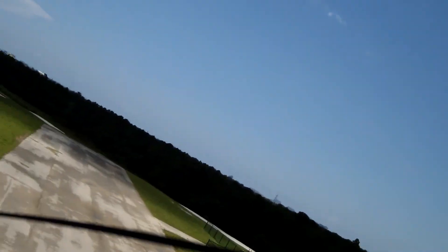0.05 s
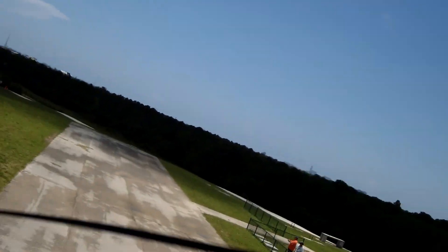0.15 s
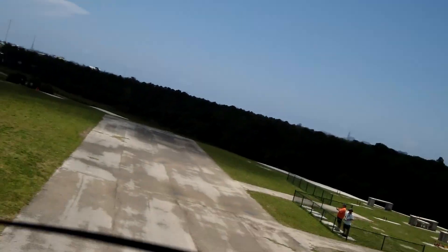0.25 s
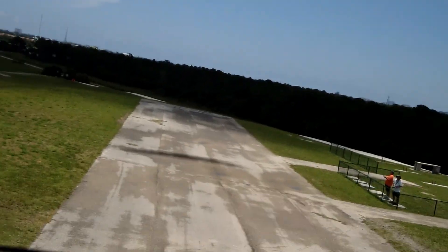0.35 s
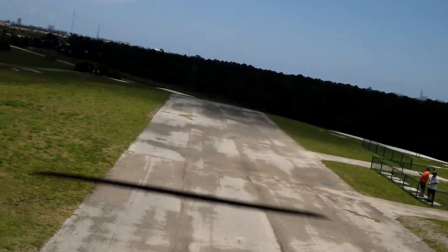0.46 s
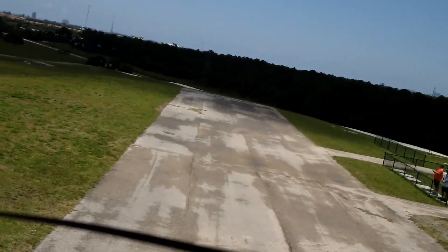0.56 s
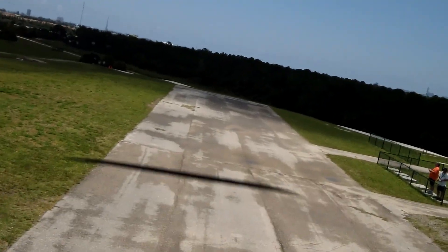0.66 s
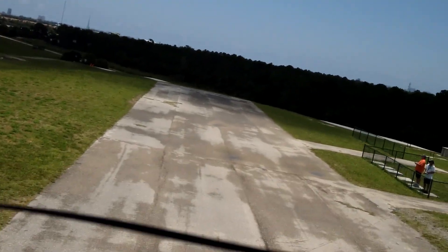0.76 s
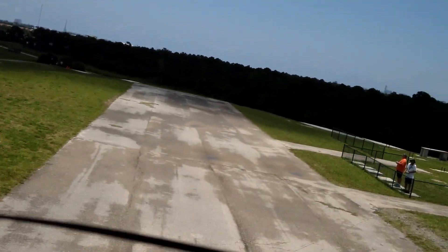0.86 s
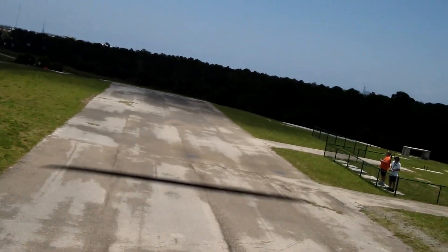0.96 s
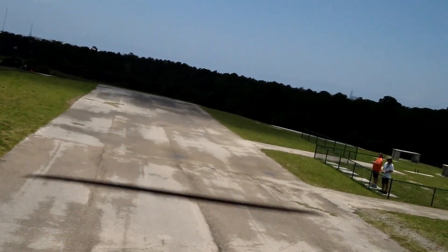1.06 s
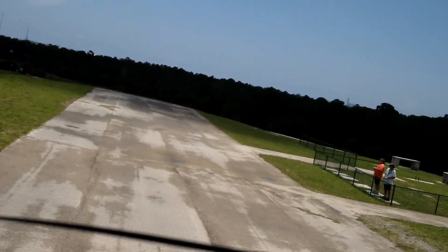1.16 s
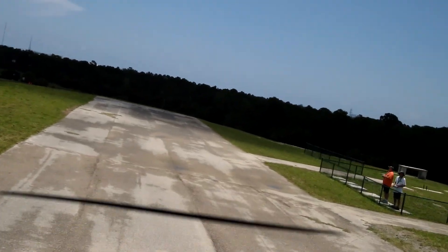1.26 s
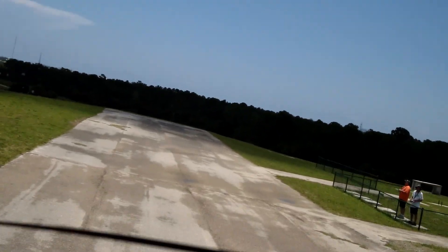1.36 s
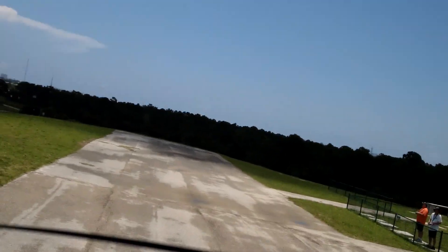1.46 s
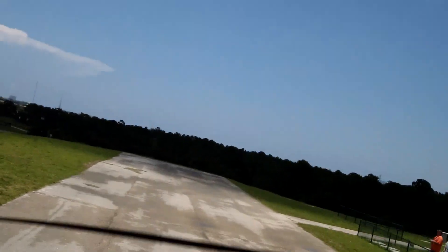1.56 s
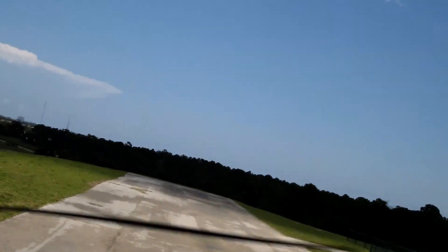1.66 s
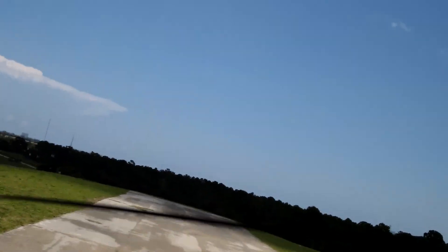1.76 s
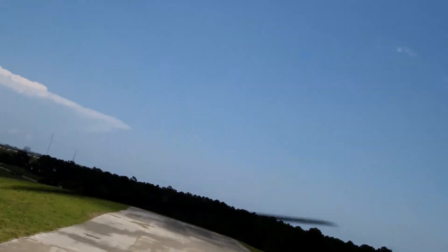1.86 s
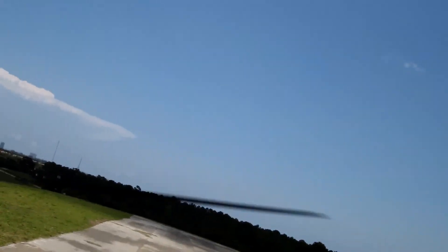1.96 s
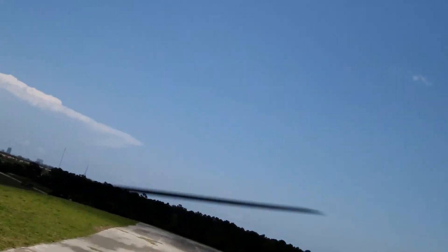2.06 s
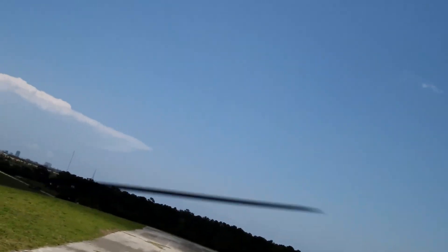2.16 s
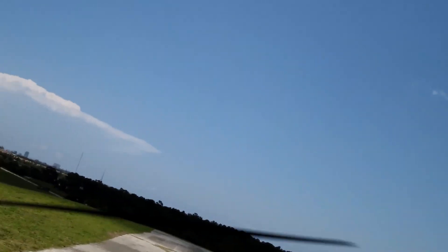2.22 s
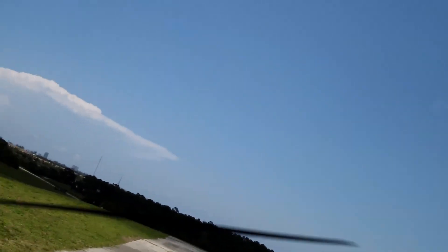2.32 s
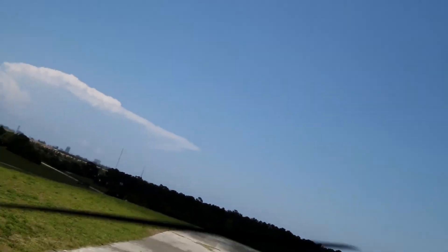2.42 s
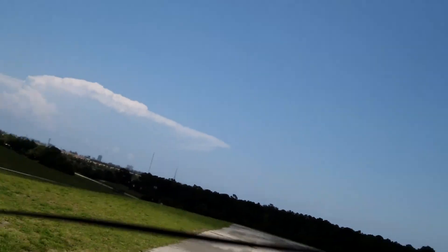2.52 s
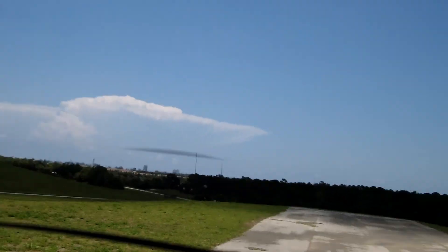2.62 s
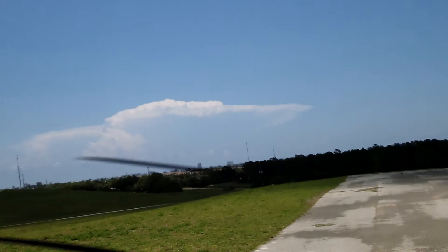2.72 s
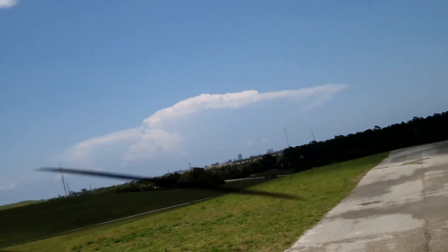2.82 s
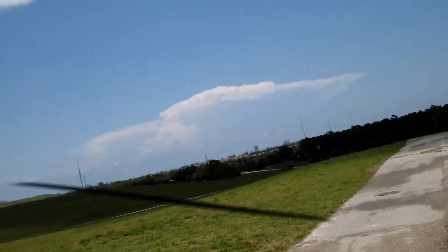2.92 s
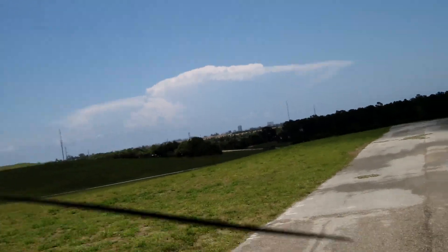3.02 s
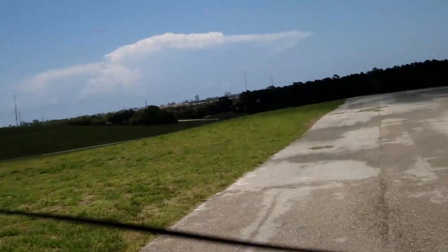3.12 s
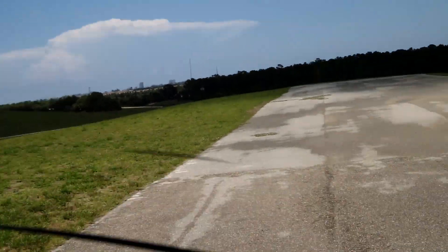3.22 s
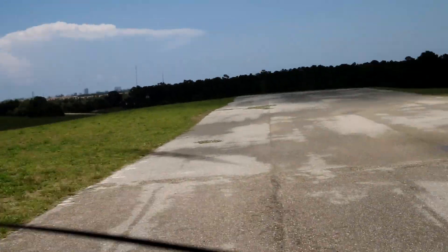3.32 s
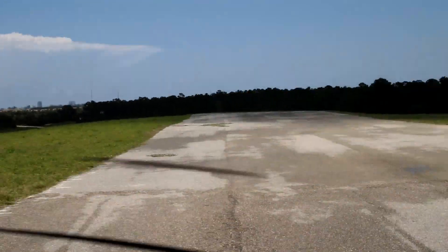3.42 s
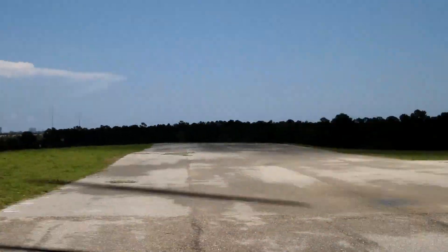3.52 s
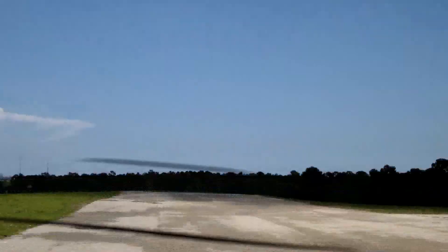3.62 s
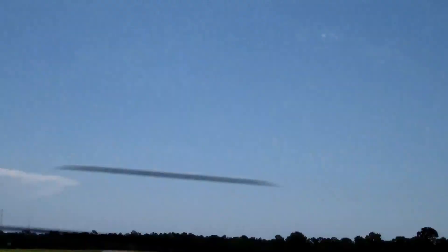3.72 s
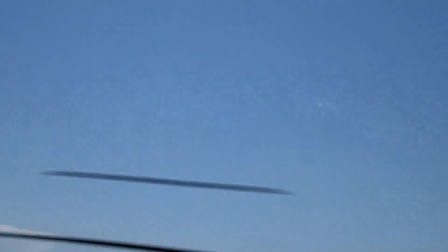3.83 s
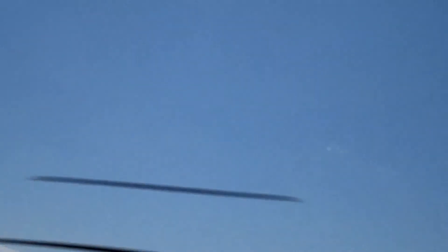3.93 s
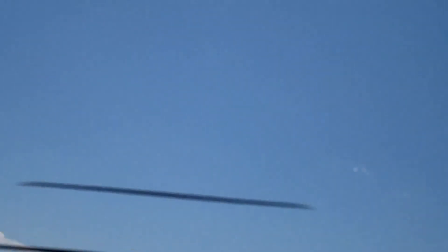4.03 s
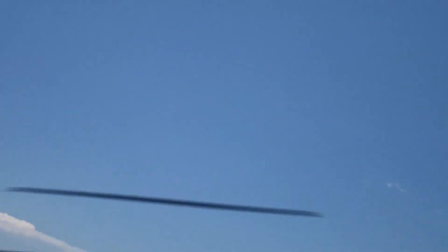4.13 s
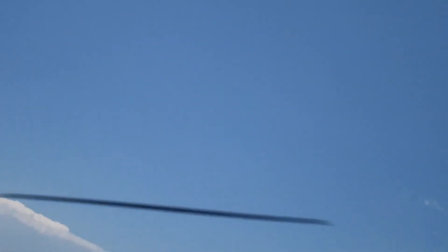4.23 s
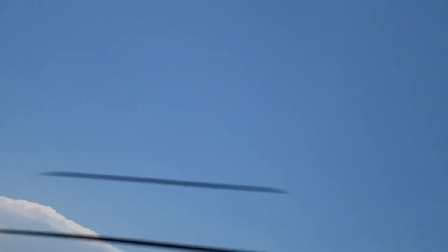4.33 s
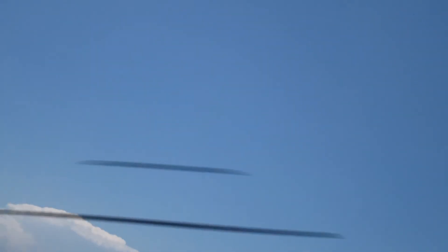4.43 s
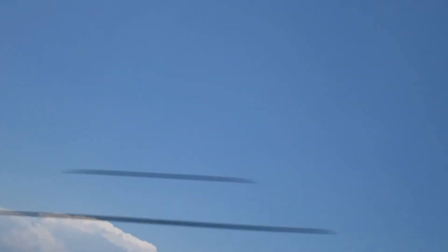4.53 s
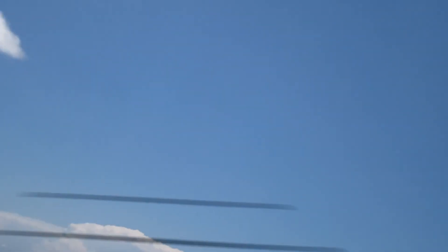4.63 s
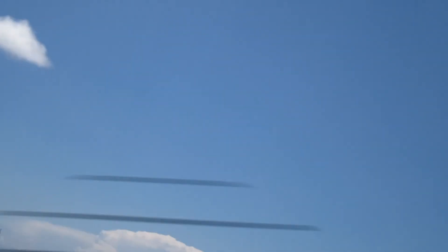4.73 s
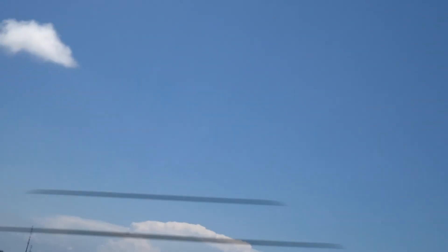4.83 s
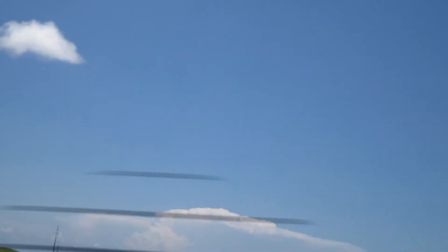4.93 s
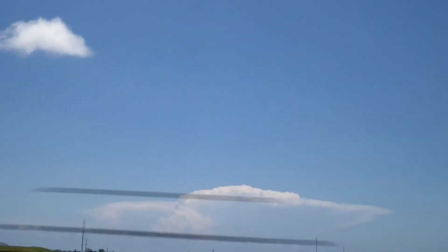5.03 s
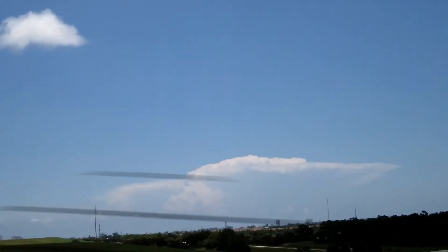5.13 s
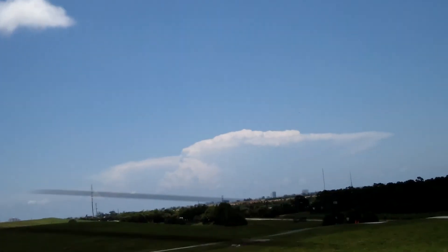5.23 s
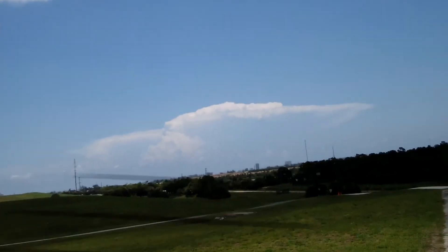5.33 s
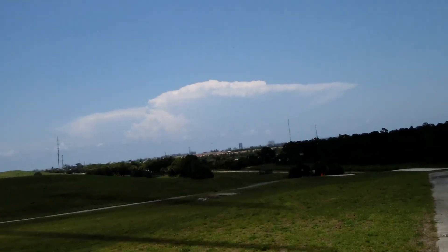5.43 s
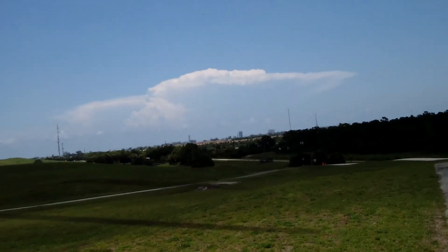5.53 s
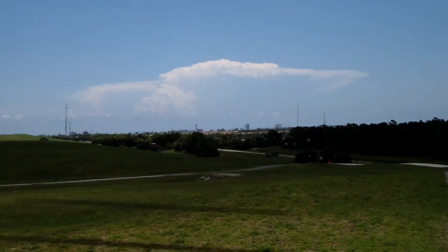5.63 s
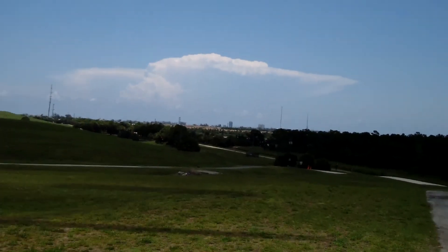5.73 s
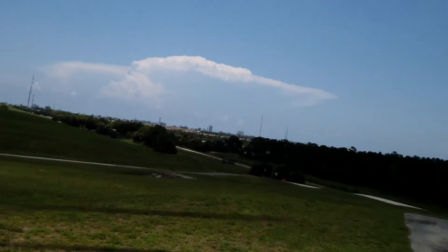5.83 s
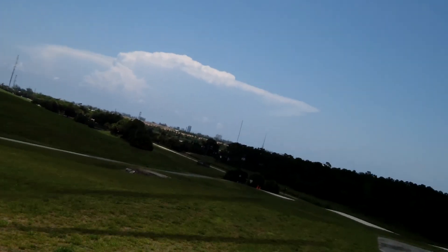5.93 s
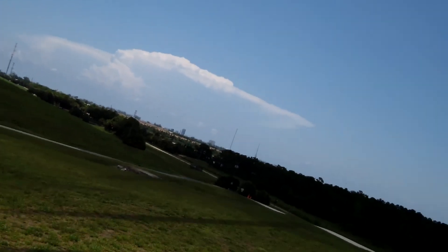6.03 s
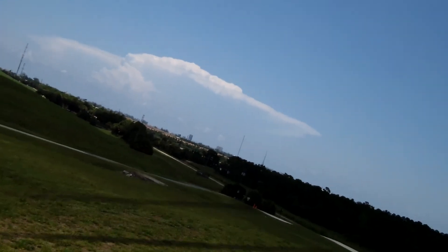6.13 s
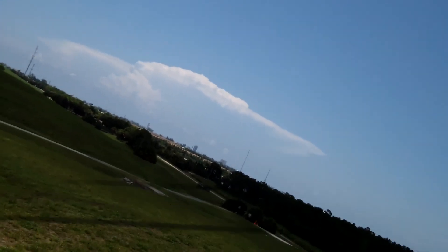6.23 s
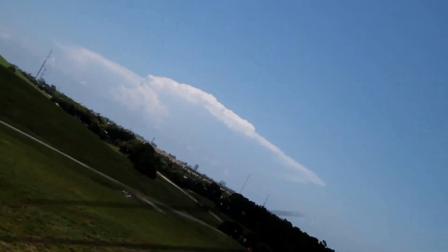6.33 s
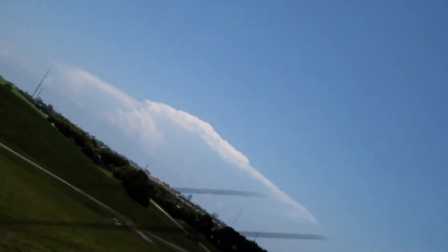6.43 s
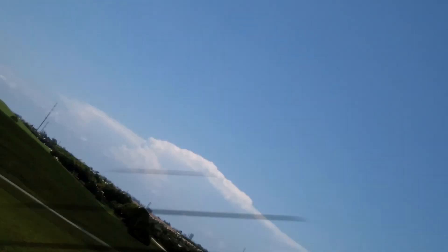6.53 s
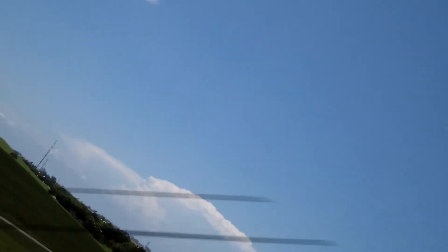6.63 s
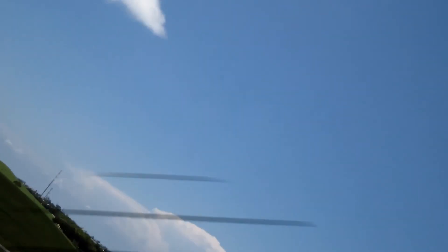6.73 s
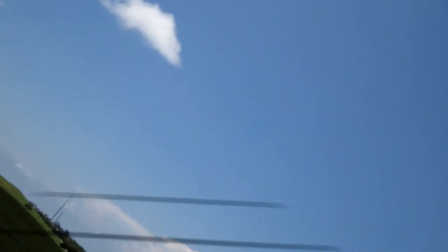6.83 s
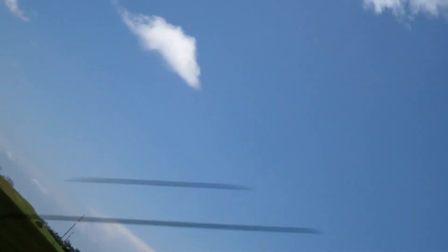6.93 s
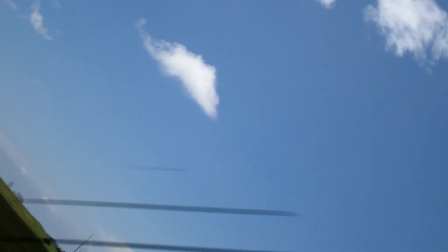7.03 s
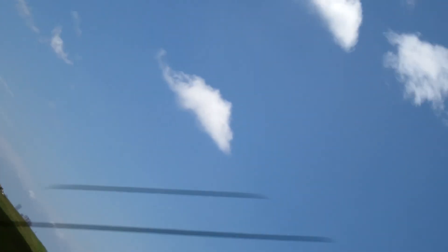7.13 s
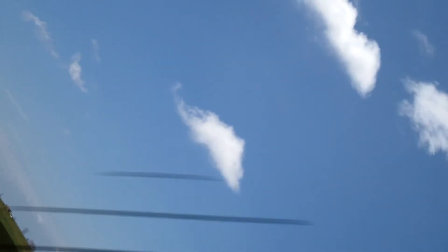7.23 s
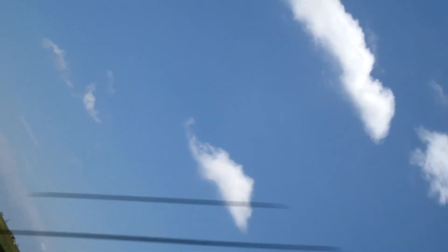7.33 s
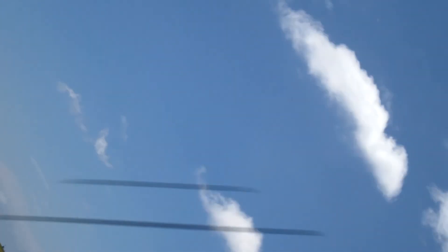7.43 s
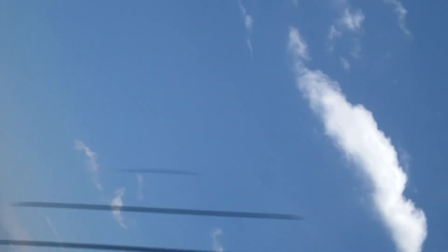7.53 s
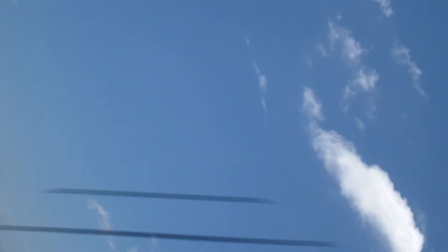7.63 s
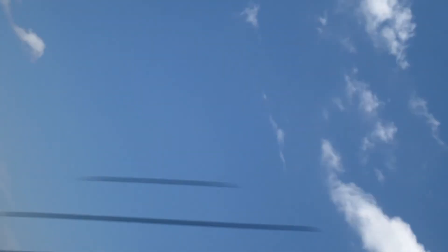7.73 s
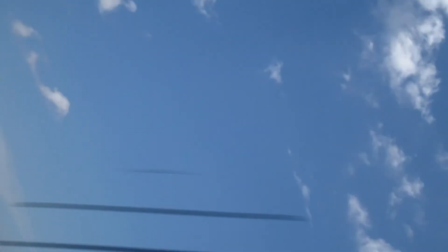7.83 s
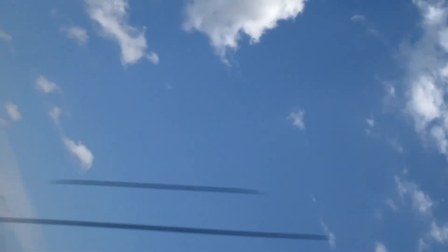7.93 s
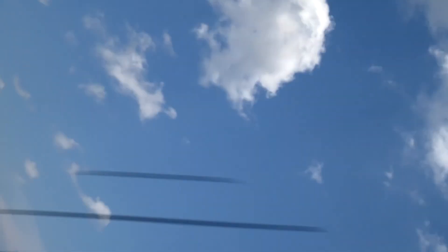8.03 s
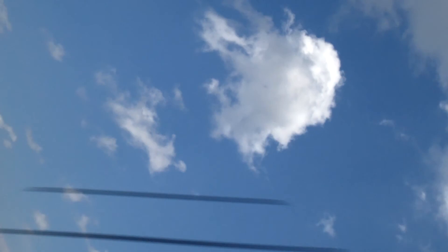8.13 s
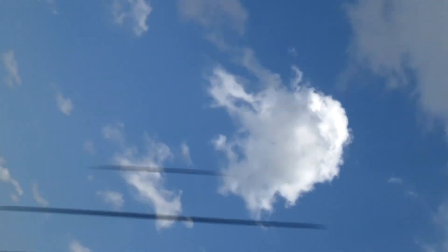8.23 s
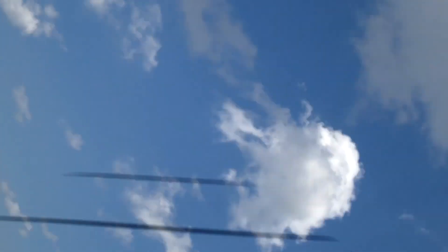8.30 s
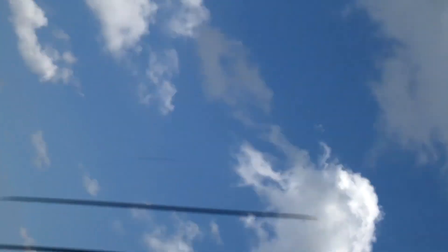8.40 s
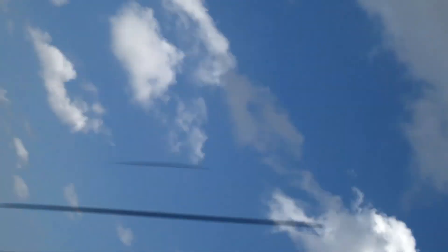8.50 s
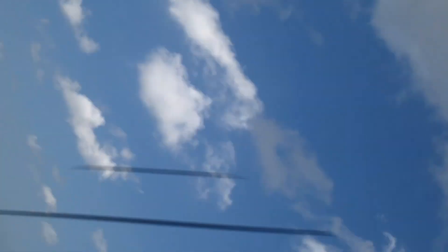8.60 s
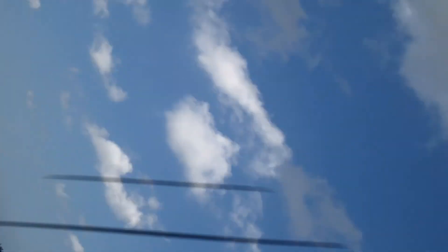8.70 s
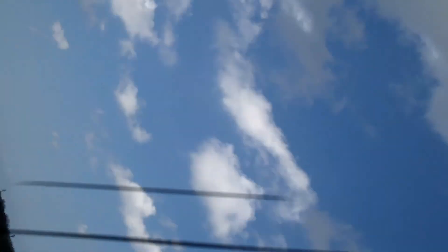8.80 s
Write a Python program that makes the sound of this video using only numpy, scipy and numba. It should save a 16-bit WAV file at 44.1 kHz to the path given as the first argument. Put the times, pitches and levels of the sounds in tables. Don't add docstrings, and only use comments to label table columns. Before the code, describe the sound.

A small camera strapped behind the two-blade propeller of an electric model plane over a grassy field. A low throbbing hum with thin motor whine rises in small steps, sags slightly, then gusts thump the microphone. The throttle opens in stages to a loud, distorted buzzing roar that holds for several seconds before dropping in pitch near the end.

```python
import sys
import numpy as np
from scipy import signal
from scipy.fft import rfft, irfft
from scipy.io import wavfile
from scipy.ndimage import uniform_filter1d
from numba import njit

SR = 44100
rng = np.random.default_rng(int(sys.argv[2]) if len(sys.argv) > 2 else 0)


def gain_from_decibels(decibels):
    exponent = np.asarray(decibels, float) / 20
    return 10 ** exponent


def dump(signal):
    limited = np.clip(np.atleast_2d(signal).T, -1, 1)
    pcm = np.round(limited * 32767).astype(np.int16)
    wavfile.write(sys.argv[1], SR, pcm)


N = 390726

# start_s, travel_s, blade_rate_change_hz
THROTTLE = [
    (.902, .042, 24.6),
    (1.219, .021, 13.9),
    (1.555, 1.137, -4.67),
    (3.382, .151, 18.45),
    (3.526, .129, 32.2),
    (4.404, .097, 23.73),
    (4.546, .249, 103.96),
    (5.021, .629, -2.1),
    (7.966, .233, -28.56),
    (8.272, .265, -38),
]
# time_s, tone_db, air_db
BLADE_LOAD = [(.1, -17, 2), (.85, -16.5, -1), (1.22, -22.5, 2), (1.55, -16.5, 1), (2.24, -16.5, 0),
              (2.4, -20, 1), (2.58, -15.5, 0), (3.3, -13.5, -5), (3.7, -17.5, -3), (3.745, -17.5, 5),
              (3.93, -24.5, 5), (4.05, -21, 9), (4.22, -21, 4), (4.33, -14, 1), (4.5, -14, -3),
              (4.78, -8.3, -2), (5.7, -4.3, 1), (8.86, -7.3, 1)]
# time_s, octave_lag_turns
INFLOW_LEAN = [(0, -.3), (1.1, -.35), (1.45, .07), (2.35, .02), (2.55, .15), (2.8, .16), (2.97, .32),
               (3.4, .24), (3.7, .06), (4.45, .08), (5.1, 0), (5.8, .04), (8, .05), (8.45, .19),
               (8.86, .19)]
# times_per_turn, under_blade_tone_db, lag_turns
TIP_BUZZ = [(1, -21, .15), (3, -14, 0.11), (6, -24.5, .22), (8, -23, 0.34), (10, -26, .4)]
# times_per_turn, on_shake_db, on_octave_db
SHAFT_ORDERS = [(1, 5.5, -30.5), (3, -10.5, -9.5), (5, -12.5, -10), (6, -37.5, -7), (7, -23.5, -12.5),
                (8, -26.5, -18), (9, -17, -24), (10, -23.5, -25.5)]
# times_per_turn, level_db, phase_wander_rad
MOTOR_LINES = [(12, -43, .2), (14, -40, .2), (18, -50, .15), (24, -50, .15), (28, -53, .15), (29, -54, .15),
               (36, -49.5, .15), (42, -44, .2), (56, -61, .2), (92, -48, 14)]
# freq_hz, gain_db
SHELL_GAIN = [(580, -4), (680, 5.5), (780, 0), (910, -3), (1160, -13), (1260, -2), (1560, -1), (1730, 9),
              (2050, -8), (2400, -7), (2750, 0), (2940, 7), (3080, -5), (3250, -35), (5880, -40),
              (6040, -22), (6250, -40)]
# freq_hz, density_db_per_hz
BUFFET_COLOUR = [(12, -43.5), (25, -2.5), (60, 0), (110, -0.5), (200, -8), (350, -9.5), (520, -22.5),
                 (800, -42.5), (1500, -46), (3000, -77)]
# freq_hz, density_db_per_hz
WAKE_COLOUR = [(30, -23.5), (70, -1.5), (150, 2), (300, -1.5), (600, -10), (1500, -27), (5000, -40.5),
               (16000, -71)]
# freq_hz, density_db_per_hz
RUSH_COLOUR = [(250, -18), (500, 0), (900, -4.5), (1300, -10.5), (2000, -15.5), (3000, -24.5),
               (4500, -32.5), (5300, -44), (7000, -54), (16000, -79.5)]
# freq_hz, density_db_per_hz
RATTLE_COLOUR = [(1000, -30.5), (1400, -8), (1750, 3.5), (2050, -6), (2250, -17.5), (2600, -16.5),
                 (2900, -11.5), (3150, -17), (3300, -26.5), (4600, -27.5), (5500, -46)]
# freq_hz, density_db_per_hz
HISS_COLOUR = [(1000, -9), (4000, 3), (8000, 0.5), (12000, -2.5), (16000, -2)]
# freq_hz, level_db
WHISTLE_LINES = [(11515, -89)]
# time_s, peak_db
LEVEL_TICKS = [(0.0298, -47), (0.5003, -49), (0.5447, -49), (0.8674, -49), (0.8914, -42), (1.0296, -45),
               (1.1069, -54), (1.2685, -48), (1.3039, -44), (1.4571, -44), (1.4825, -52), (2.3027, -48),
               (2.5182, -44), (2.9223, -53), (3.0096, -51), (3.033, -54), (4.1011, -57)]
# time_s, peak_db
GUST_SLAPS = [(0.459, -27), (2.532, -18.5), (3.011, -17.5), (3.035, -22), (3.15, -24), (3.746, -15),
              (3.809, -29), (3.934, -20), (4.066, -13), (4.242, -14.5), (4.304, -22.5), (4.481, -18),
              (4.611, -15.5)]

IDLE_HZ, START_HZ, CRUISE_HZ, FULL_HZ = 94.33, 109.6, 128., 305.
FOAM_HZ = 440


def walk(rate_hz):
    hold = int(SR / rate_hz)
    steps = np.repeat(rng.standard_normal(N // hold + 1), hold)
    return 1.3 * uniform_filter1d(uniform_filter1d(steps, hold), hold)[:N]


def curves(table):
    time_s, *columns = np.transpose(table)
    return [np.interp(np.arange(N) / SR, time_s, column) for column in columns]


def noise(colour):
    hz, db = np.transpose(colour)
    bins_hz = np.arange(N // 2 + 1) * SR / N + 1
    gain = gain_from_decibels(np.interp(np.log(bins_hz), np.log(hz), db))
    x = irfft(rfft(rng.standard_normal(N)) * gain, N)
    return x / np.std(x)


def struck(events, shape):
    hits = np.zeros(N)
    for time_s, db in events:
        hits[int(time_s * SR)] = gain_from_decibels(db)
    return signal.fftconvolve(hits, shape)[:N]


@njit
def spin(wanted_hz, hz, lag_s):
    out = np.empty(len(wanted_hz))
    for i in range(len(out)):
        out[i] = hz
        hz += (wanted_hz[i] - hz) / (SR * lag_s[int(hz)])
    return out


def speed():
    t = np.arange(N) / SR
    wanted_hz = IDLE_HZ + sum(hz * np.clip((t - start_s) / travel_s, 0, 1)
                              for start_s, travel_s, hz in THROTTLE)
    cruise_lag_s, lag_power = .166, 2.72
    return spin(wanted_hz, START_HZ, cruise_lag_s * (CRUISE_HZ / np.arange(1, 400)) ** lag_power)


def surge(blade_hz):
    growth_per_s = np.gradient(np.log(blade_hz)) * SR
    return np.clip(uniform_filter1d(growth_per_s, size=3000), 0, 1)


def order(turn, k, size, lag_rad, rough):
    level = np.sqrt(2) * size * gain_from_decibels(1.77 * rough * walk(35))
    return level * np.cos(k * turn - lag_rad + .12 * rough * walk(30))


def blade_thump(turn, tone_db, octave_db, lean):
    tone = order(turn, 2, gain_from_decibels(tone_db + 2.5), 0, .47)
    return tone + order(turn, 4, gain_from_decibels(octave_db), 2 * np.pi * lean, .82)


def tip_buzz(turn, blade_hz, tone_db):
    tips = gain_from_decibels(tone_db + 55 * np.log10(blade_hz / 305))
    return sum(order(turn, k, tips * gain_from_decibels(db), 2 * np.pi * lag_turns, .4) for k, db, lag_turns in TIP_BUZZ)


def shaft_shake(turn, blade_hz, shake_db, octave_db, lean):
    shake = 0
    for k, on_shake_db, on_octave_db in SHAFT_ORDERS:
        passed = np.minimum((2 * FOAM_HZ / k / blade_hz) ** 3 + (blade_hz / FULL_HZ) ** 3, 1)
        size = passed * (gain_from_decibels(shake_db + on_shake_db) + gain_from_decibels(octave_db + on_octave_db))
        shake = shake + order(turn, k, size, np.pi * (k - 2) * lean, 1.154)
    return shake


def propeller(turn, blade_hz, tone_db, octave_db, shake_db, lean):
    turn = turn + .1 * (128 / blade_hz) ** .3 * walk(45)
    thump = blade_thump(turn, tone_db, octave_db, lean)
    buzz = tip_buzz(turn, blade_hz, tone_db)
    return thump + buzz + shaft_shake(turn, blade_hz, shake_db, octave_db, lean)


def motor(turn, blade_hz):
    hz, shell_db = np.transpose(SHELL_GAIN)
    whine = 0
    for k, db, wander_rad in MOTOR_LINES:
        gain_db = np.interp(np.log(k * blade_hz / 2), np.log(hz), shell_db)
        level = gain_from_decibels(db + gain_db + 1.5 * walk(12))
        whine = whine + level * np.sin(k * turn + wander_rad * walk(90))
    surge_db, fade_db, fade_hz, fade_span_hz = 2.5, -13, 135, 170
    fade = np.clip((blade_hz - fade_hz) / fade_span_hz, 0, 1)
    return gain_from_decibels(surge_db * surge(blade_hz) + fade_db * fade) * whine


def wash(turn, blade_hz, tone_db, buffet_db, rush_db):
    pump = 1 + .3 * np.cos(2 * turn - 1.1)
    buffet = gain_from_decibels(buffet_db + 16.5 + 1.1 * walk(16)) * noise(BUFFET_COLOUR) * pump
    wake = gain_from_decibels(tone_db - 8 + 28 * np.log10(blade_hz / 305)) * noise(WAKE_COLOUR)
    rush = gain_from_decibels(rush_db + 8 + 1.7 * walk(60) + .4 * walk(12)) * noise(RUSH_COLOUR) * pump
    rattle = gain_from_decibels(-45.5 + 1.1 * walk(20)) * noise(RATTLE_COLOUR) * pump
    return buffet + wake + rush + rattle


def electronics():
    t = np.arange(N) / SR
    whistle = sum(np.sqrt(2) * gain_from_decibels(db) * np.sin(2 * np.pi * hz * t) for hz, db in WHISTLE_LINES)
    return whistle + gain_from_decibels(-77) * noise(HISS_COLOUR)


def ticks():
    return struck(LEVEL_TICKS, 4.5 * np.exp(-np.arange(SR // 100) / SR / .0012))


def slaps():
    age_s = np.arange(SR // 20) / SR
    slap = np.sin(2 * np.pi * 700 * age_s) * np.exp(-age_s / .001) * (1 - np.exp(-age_s / .0003))
    thud_db, thud_s = -3, .009
    swell = struck(GUST_SLAPS, age_s / thud_s * np.exp(-age_s / thud_s))
    return struck(GUST_SLAPS, 1.9 * slap) + gain_from_decibels(thud_db) * noise(BUFFET_COLOUR) * swell


def scene():
    blade_hz = speed()
    tone_db, air_db = curves(BLADE_LOAD)
    lean = curves(INFLOW_LEAN)[0]
    fast = np.log(blade_hz / CRUISE_HZ) / np.log(FULL_HZ / CRUISE_HZ)
    above_cruise = np.maximum(fast, 0)
    octave_db = tone_db - 21 + 13.5 * np.tanh(np.abs(lean) / .2) + 4.5 * above_cruise
    shake_db = -36.5 + 14.5 * fast + .15 * air_db + 2 * walk(5) + 3.5 * surge(blade_hz)
    buffet_db = -40.5 + 7 * above_cruise + .25 * air_db
    rush_db = -50.5 + 11.5 * above_cruise + air_db
    turn = np.cumsum(np.pi * blade_hz / SR)
    blades = propeller(turn, blade_hz, tone_db, octave_db, shake_db, lean)
    air = wash(turn, blade_hz, tone_db, buffet_db, rush_db) + slaps()
    return (blades + motor(turn, blade_hz) + air)[None]


def roll_off(x):
    return signal.sosfilt(signal.butter(12, 15830, fs=SR, output="sos"), x)


def record(dry):
    capsule = np.clip(dry, -.53, .83)
    coupled = signal.lfilter(*signal.butter(2, 123, "high", fs=SR), capsule)
    clipped = np.clip(coupled + ticks() + electronics(), -.7, .715)
    notched = signal.lfilter(*signal.iirnotch(7750, 40., SR), clipped)
    settled = notched * np.minimum(np.arange(N) / 100, 1)
    return roll_off(settled)


dry = scene()
out = record(dry)
dump(out)
```